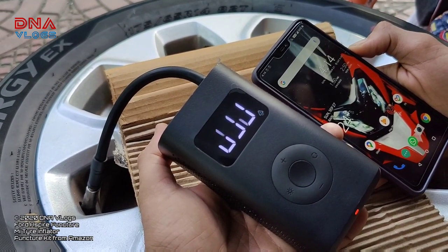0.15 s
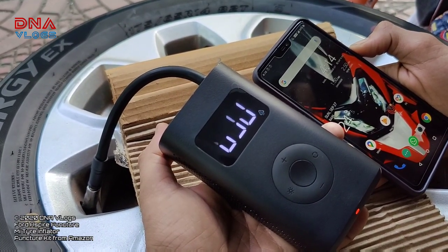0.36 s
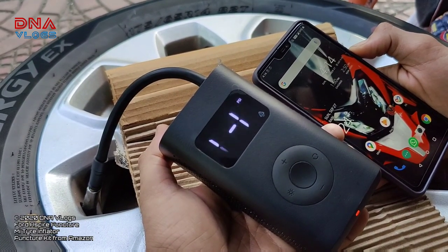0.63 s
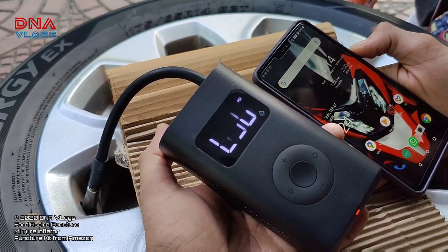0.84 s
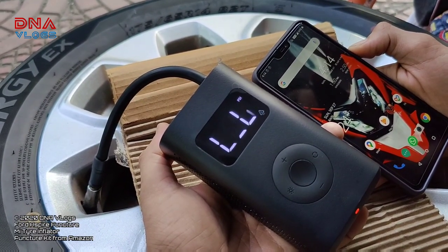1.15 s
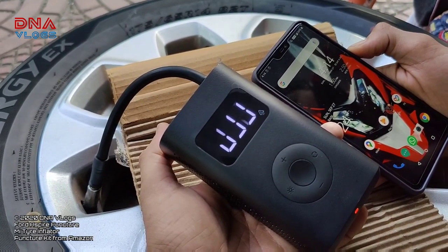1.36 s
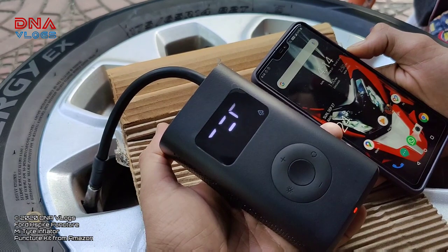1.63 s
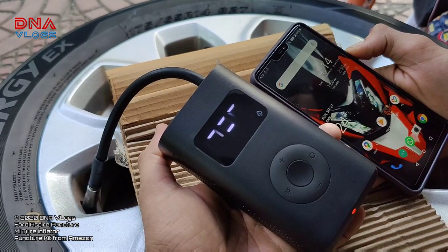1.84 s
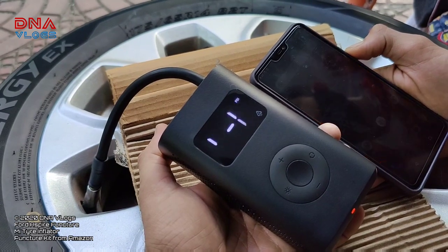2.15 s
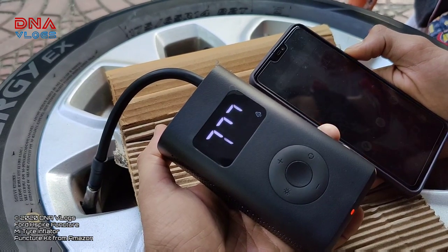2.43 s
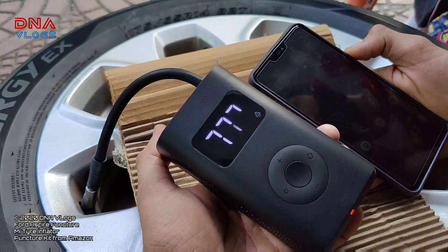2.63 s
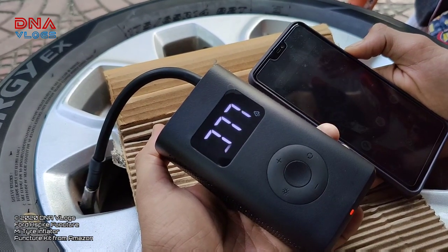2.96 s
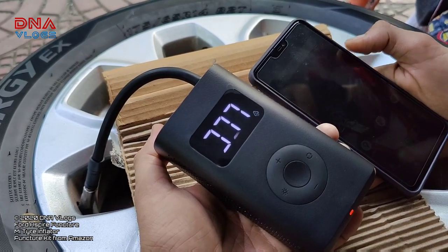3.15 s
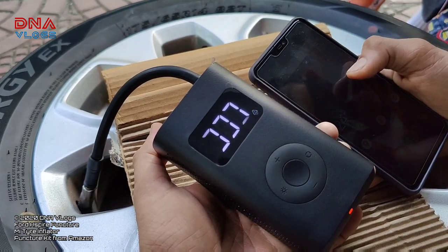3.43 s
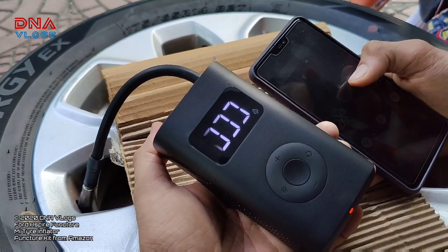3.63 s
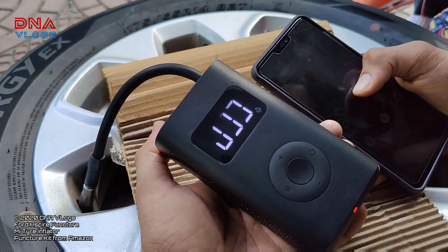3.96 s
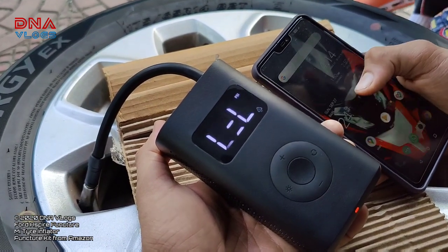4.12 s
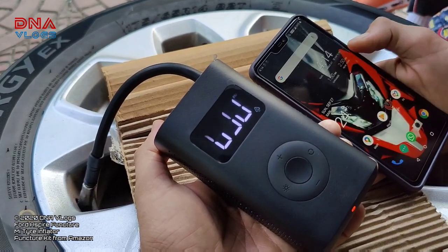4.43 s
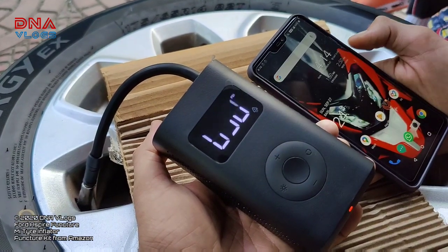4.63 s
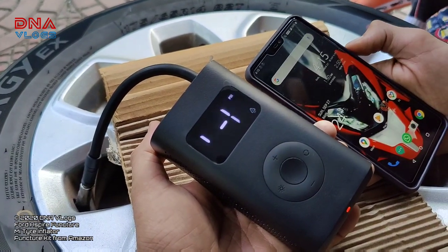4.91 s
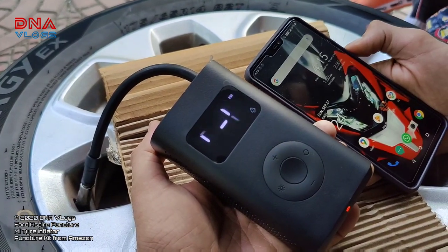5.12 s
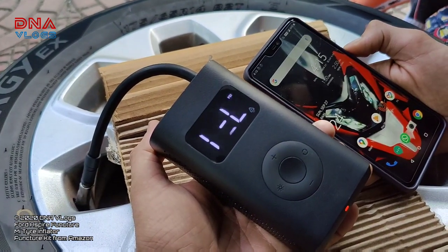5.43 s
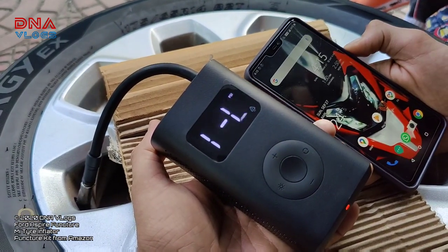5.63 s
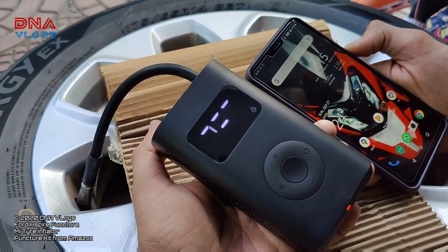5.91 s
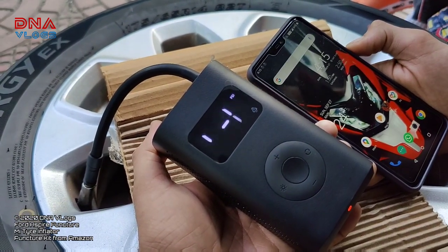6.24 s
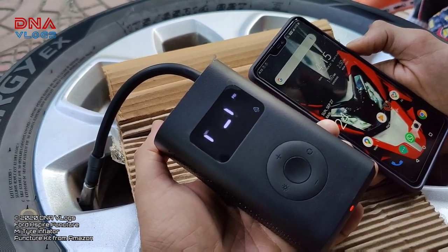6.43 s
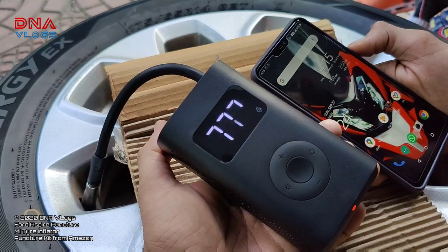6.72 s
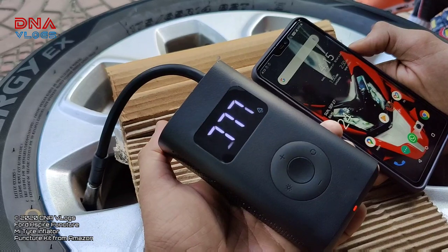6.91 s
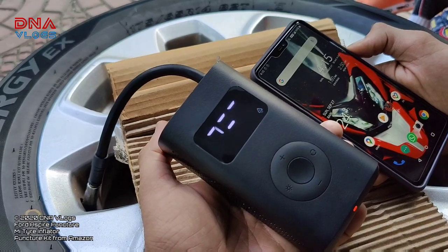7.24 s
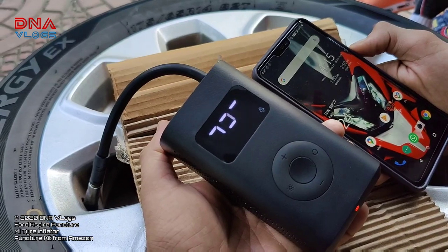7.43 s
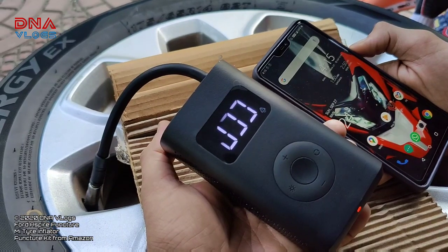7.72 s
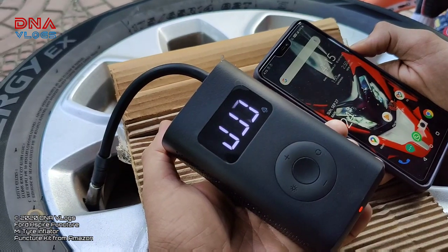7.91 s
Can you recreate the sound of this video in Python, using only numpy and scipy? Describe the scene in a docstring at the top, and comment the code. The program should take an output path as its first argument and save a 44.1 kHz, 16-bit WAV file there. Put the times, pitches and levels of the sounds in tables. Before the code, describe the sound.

A hand-held electric air pump runs without a break close to the microphone, inflating a car tyre in a street. Its piston knocks in a fast, even rattle, blended with whirring gears, rushing air and tiny valve squeaks in a plastic case. It slowly grows louder, with a few brief ticks of hiss and two soft handling thuds in the second half. Far off, an engine revs faintly over low traffic.

```python
"""Pumping up a car tyre

A hand-held electric pump runs close by in a street. Its motor turns a crank through a gear,
about 32 turns a second. On each turn the valves squeak as air is pushed out, then the piston knocks.
Air and gear noise ring in the plastic case, and the pump grows louder as the pressure builds.
Brief bursts of hiss sharpen the rattle, handling makes soft thuds, and a far engine revs over traffic."""
import sys
import numpy as np
from scipy import signal
from scipy.io import wavfile

SR = 44100
rng = np.random.default_rng(int(sys.argv[2]) if len(sys.argv) > 2 else 0)


def file_out(sig):
    """Save sig as 16-bit WAV at sys.argv[1]."""
    # one column per channel
    cols = np.atleast_2d(sig).T
    # limit, then scale
    lim = np.clip(cols, -1, 1)
    pcm = np.round(lim * 32767).astype(np.int16)
    wavfile.write(sys.argv[1], SR, pcm)


N = 355887
TIME = np.arange(N) / SR


def from_db(db):
    """Turn decibels into a number to multiply by."""
    return np.exp(np.asarray(db) * (np.log(10) / 20))


def rms_one(x):
    """Scale a signal so that its average strength (rms) is 1."""
    return x / np.sqrt(np.mean(x ** 2) + 1e-20)


def drift(rate):
    """A smooth random curve of strength 1 that changes about `rate` times a second."""
    step, warm_up = 8, 4000   # one value every 8 samples; the first 4000 are dropped
    pole = np.exp(-2 * np.pi * step * rate / SR)
    noise = rng.standard_normal(N // step + warm_up + 2)
    slow = signal.lfilter([1], [1, -2 * pole, pole * pole], noise)[warm_up:]
    return np.interp(np.arange(N) / step, np.arange(len(slow)), rms_one(slow))


def per_turn(turn):
    """One random value for each crank turn; it changes halfway between whole turns."""
    index = np.floor(turn + 1.5).astype(int)
    return rng.standard_normal(size=400)[index]


def stereo_noise(apart):
    """Hiss shared by left and right, plus some of their own, set by `apart`."""
    return rms_one(rng.standard_normal(N) + apart * rng.standard_normal((2, N)))


def side_gains(pan_db, lead):
    """Left and right gains (complex): the left is `pan_db` louder and `lead` radians ahead."""
    sides = np.array([1, -1])
    return from_db(sides * pan_db / 2) * np.exp(.5j * lead * sides)


def ring(x, hz, width, pan_db=0, lead=0, order=1):
    """A stereo resonance: x rings near `hz`. Order 2 lets less of the far-off pitches through."""
    poles = np.poly([np.exp((-np.pi * width + 2j * np.pi * hz) / SR)] * order)
    feedback = np.convolve(poles, poles.conj()).real
    drives = np.broadcast_to(x + 1e-18, (2, N))
    return np.array([signal.lfilter(np.imag(gain * poles.conj()), feedback, drive)
                     for gain, drive in zip(side_gains(pan_db, lead), drives)])


def case_whirr(turn, grain_db=1.0, uneven_db=0.47, scatter_db=1.17):
    """Rushing air and gear teeth make the case ring; each stroke favours other resonances."""
    # air and gear noise over one turn, knock at 0: (position [turns], relative level [dB])
    stroke = [(-.52, -3.5), (-.23, 0.8), (-.04, -1), (.012, 2.5), (.045, .5), (.085, 1.5), (.16, -1.5),
              (.35, -2.5)]
    # resonances of the case: (pitch [Hz], width [Hz], relative level [dB], left over right [dB],
    # left lead [rad], share that repeats every turn [0-1])
    resonances = [(687, 520, -18.5, 2, 0, 0.16), (920, 117, -14, 2.5, 0.3, 0.18),
                  (1213, 430, -16.5, -0.5, 1.26, 0.13), (1644, 520, -5.5, 4.5, 0.53, 0.14),
                  (2000, 690, -6.5, -0.5, 2, 0.02), (2372, 400, -6, -2, 0.08, 0.18),
                  (2842, 185, -10, 0, 1, 0.11), (3360, 164, -17.5, 4, 2, 0.33),
                  (3980, 820, -14.5, 3, -1, 0.02), (4873, 490, -12.5, 1, -0.5, 0.22),
                  (5565, 740, -9, 3.5, -0.1, 0.44), (6114, 710, -5, 4, 0.43, 0.16),
                  (7080, 450, -15, 0, 4, 0.27), (7640, 260, -15, 0, 4, 0.2),
                  (8230, 290, -13, -1.5, 1.06, 0.16), (8760, 370, -15, 6.5, 0.35, 0),
                  (9860, 1040, -15, -0.5, -0.5, .05), (11000, 520, -21, -2, 1.5, .1),
                  (12010, 600, -23, 1, 0.5, .1), (12530, 450, -26, -1.5, -0.3, 0.5)]
    position, stroke_db = np.transpose(stroke)
    force_db = np.interp(turn, position, stroke_db, period=1)
    force = from_db(force_db + uneven_db * per_turn(turn) + grain_db * drift(460))
    surface = rng.standard_normal(size=1386)   # the same rough teeth come round on every turn
    teeth = force * surface[(turn % 1 * len(surface)).astype(int)]
    air = [force * stereo_noise(apart=0.48), force * stereo_noise(apart=0.56)]
    out = 0
    for k, (hz, width, db, pan_db, lead, repeats) in enumerate(resonances):
        drive = np.sqrt(repeats) * teeth + np.sqrt(1 - repeats) * air[k % 2]
        drive *= from_db(scatter_db * per_turn(turn))
        ringing = ring(drive, hz, width, pan_db, lead, order=2)
        out += ringing * (from_db(db) / ringing.std())
    return out


def gear_whine(turn, teeth, level_db=-10, peak_turn=0.024, swing_db=7.0, uneven_db=2.0):
    """The gear teeth meet with a rough whine that swells under the piston's load once a turn."""
    load_db = swing_db * np.cos(2 * np.pi * (turn - peak_turn)) + uneven_db * per_turn(turn)
    phase = 2 * np.pi * teeth * turn + 1.7 * drift(rate=70)
    whine = from_db(level_db + load_db) * np.sin(phase)
    return whine * np.abs(side_gains(pan_db=3.5, lead=0))[:, None]


def motor_hum(turn, gear_ratio, motor_db=-24.5, sag_rad=0.22):
    """The motor hums, slowing a little on every stroke, while the crank shakes the pump body."""
    # shaking of the body: (pitch [multiple of the crank rate], relative level [dB])
    shakes = [(2, -24), (4, -44), (5, -49), (6, -38.5), (8, -36.5)]
    angle = 2 * np.pi * turn
    shake = sum(from_db(db) * np.cos(multiple * angle) for multiple, db in shakes)
    motor = from_db(motor_db) * np.sin(gear_ratio * angle + sag_rad * np.sin(angle))
    return np.sqrt(2) * (motor - shake)


def far_engine(idle_hz=22.42, revved_hz=25.86, boom_hz=122, boom_width_hz=7, boom_db=-54, waver_db=6.5):
    """A far engine drones when revved, and booms as one of its tones slides through a resonance."""
    # presses of the throttle: (start [s], rise [s], release [s], fall [s], drone level [dB])
    revs = [(-.3, .2, .8, 0.295, -57.5), (2.42, 0.038, 3.26, 0.592, -61.5), (5.77, 0.473, 7.24, .6, -65)]
    # engine tones: (pitch [multiple of the firing rate], idle level [dB], revved level [dB])
    overtones = [(3, -66.5, -77), (4, -84, -68), (5, -73, -69), (6, -69, -75)]
    throttle, drone_level, tones = 0, 0, 0
    for start, rise, release, fall, db in revs:
        rev = np.interp(TIME, [start, start + rise, release, release + fall], [0, 1, 1, 0])
        throttle += rev
        drone_level += rev * from_db(db)
    firing_hz = idle_hz + (revved_hz - idle_hz) * throttle
    phase = 2 * np.pi * np.cumsum(firing_hz) / SR
    drone = np.sin(3 * phase) + from_db(-5) * np.sin(2 * phase)
    for multiple, idle_db, revved_db in overtones:
        tone_db = idle_db + (revved_db - idle_db) * throttle + waver_db * drift(18)
        tones += from_db(tone_db) * np.sin(multiple * phase)
    boom = np.sin(5 * phase) / (1 + (2 * (5 * firing_hz - boom_hz) / boom_width_hz) ** 2)
    return np.sqrt(2) * (drone_level * drone + tones + from_db(boom_db) * boom)


def traffic(deep_db=-64, upper_db=-61.0):
    """Traffic rumbles low and steady."""
    deep = rms_one(ring(stereo_noise(apart=0.09), hz=53.6, width=59, order=2))
    upper = rms_one(ring(stereo_noise(apart=0.09), hz=143, width=95))
    return from_db(deep_db) * deep + from_db(upper_db) * upper


def valve_squeaks(turn, speed, uneven_db=2.5, wander_hz=130, detune=0.0095, jitter_turns=.018):
    """Valve flaps flutter as air is pushed out; each squeak has its own moment, pitch and strength."""
    # squeaks within a turn: (centre [turns], half length [turns], pitch [Hz], glide [Hz per turn],
    # relative level [dB], phase wander [rad])
    squeaks = [(-.335, 0.041, 6000, 0, -3.5, 1.1), (-.2, 0.09, 6200, 0, -9, 1.35),
               (-0.22, 0.08, 8494, -3800, -5.5, 0.96), (-0.21, .085, 12400, -3600, -28, 1.68),
               (-.165, 0.049, 1527, -600, -1.5, .45)]
    out = 0
    for centre, half_length, hz, glide, db, wander in squeaks:
        cycle = turn - centre
        looseness = wander ** 2   # the freer the flap, the less it repeats itself
        offset = cycle - np.round(cycle)   # turns from the middle of the nearest squeak
        pitch = hz * (1 + detune * looseness * per_turn(cycle))
        phase = 2 * np.pi * (pitch * offset + glide * offset ** 2 / 2) / speed
        phase += wander * drift(wander_hz)
        swell = np.exp(-.5 * ((offset + jitter_turns * per_turn(cycle)) / half_length) ** 2)
        strength = from_db(db + uneven_db * per_turn(cycle))
        out += np.sqrt(2) * strength * swell * np.sin(phase)
    return out


def piston_knock(turn, uneven_db=0.52, scatter_db=0.2, jitter_s=.000015, band_hz=(600, 3501)):
    """The slightly loose piston strikes the pump body once a turn; the case rings a moment later."""
    # resonances the piston strikes: (pitch [Hz], width [Hz], relative peak [dB], left over right [dB],
    # left lead [rad], delay after the blow [s])
    resonances = [(531, 140, -0.5, 1.5, 0.29, 0.00048), (722, 135, -1.5, 4, 0.91, 0.00075),
                  (926, 52.4, 1.5, 1, 0.39, .00062), (1200, 620, -3.5, 9, 1.2, 0.00085),
                  (1594, 114, 2, -6, 0.91, 0.00017), (1754, 68, 4, 5, 2.04, 0.00046),
                  (2335, 140, 9, 5.5, 1.28, 0.001099), (2598, 190, 9.5, 2.5, 0.8, 0.001304),
                  (2820, 126, 4, -1, 0.46, 0.00119)]
    blows = np.flatnonzero(np.diff(np.floor(turn)) > 0)
    blows = blows + jitter_s * SR * rng.standard_normal(len(blows))
    blow_db = uneven_db * rng.standard_normal(len(blows))
    out = 0
    for hz, width, db, pan_db, lead, delay in resonances:
        arrivals = np.clip(np.round(blows + delay * SR).astype(int), 0, N - 1)
        clicks = np.zeros(N)
        clicks[arrivals] = from_db(db + blow_db + scatter_db * rng.standard_normal(len(blows)))
        out -= ring(clicks, hz, width, pan_db, lead)
    # the body is too small to give off bass, and the slightly soft contact dulls the treble
    return signal.sosfilt(signal.butter(1, band_hz, "band", fs=SR, output="sos"), out)


def hollow_case(x, hz=1990, width=480, cancel=.85):
    """Near 2 kHz the case pushes air opposite ways left and right, so what they share mostly cancels."""
    shared = x.mean(axis=0)
    shared_band = shared - signal.lfilter(*signal.iirnotch(hz, hz / width, fs=SR), shared)
    return x - cancel * shared_band


def bright_accents(hz=6150, width=900, decay_s=0.0044, gain_db=-7):
    """Brief bursts of high hiss now and then sharpen the pump's rattle."""
    # bursts of hiss: (time [s], relative peak [dB])
    accents = [(1.4542, -19), (1.7928, -21), (3.4301, -29), (4.322, -23), (4.5, -19), (4.574, -26),
               (5.445, -17), (6.5156, -20), (6.9516, -23.5)]
    bursts = sum(from_db(db) * np.exp(-np.abs(TIME - s) / decay_s) * (TIME >= s) for s, db in accents)
    return from_db(gain_db) * bursts * rms_one(ring(stereo_noise(apart=0.36), hz, width))


def handling_bumps(hz=62, width=35, half_length_s=0.059):
    """Handling the pump makes a soft, low thud now and then."""
    # dull thuds: (time [s], level [dB])
    bumps = [(5.07, -49), (7.88, -55)]
    swell = sum(from_db(db) * np.exp(-.5 * ((TIME - s) / half_length_s) ** 2) for s, db in bumps)
    return swell * rms_one(ring(stereo_noise(apart=0.1), hz, width, order=2))


def scene(start_db=-37, loaded_db=-31, pressure_rise_s=4.16, gear_teeth=79, motor_teeth=8):
    """The crank sets the pump's rhythm; rising tyre pressure makes it louder, ever more slowly."""
    # how fast the crank spins: (time [s], speed [turns per second])
    crank_speeds = [(0, 31.904), (2, 31.861), (2.9, 31.693), (4.1, 31.798), (5, 31.757), (8.07, 31.852)]
    speed = np.interp(TIME, *np.transpose(crank_speeds))
    start_turn, wobble_turns = -.445, .002   # the crank runs a little unevenly
    turn = start_turn + np.cumsum(speed) / SR + wobble_turns * drift(3)
    pump = case_whirr(turn) + gear_whine(turn, gear_teeth)
    pump += valve_squeaks(turn, speed) + piston_knock(turn)
    pump = hollow_case(pump) + motor_hum(turn, gear_teeth / motor_teeth)
    effort_db = loaded_db + (start_db - loaded_db) * np.exp(-TIME / pressure_rise_s)
    return from_db(effort_db) * pump + bright_accents() + handling_bumps() + far_engine() + traffic()


def record(dry, low_hz=25, high_hz=13100):
    """Thin out the deepest bass and cut off the highest treble."""
    thinned = signal.sosfilt(signal.butter(2, low_hz, "high", fs=SR, output="sos"), dry)
    return signal.sosfilt(signal.ellip(12, .1, 90, high_hz, fs=SR, output="sos"), thinned)


dry = scene()
out = record(dry)
file_out(out)
```